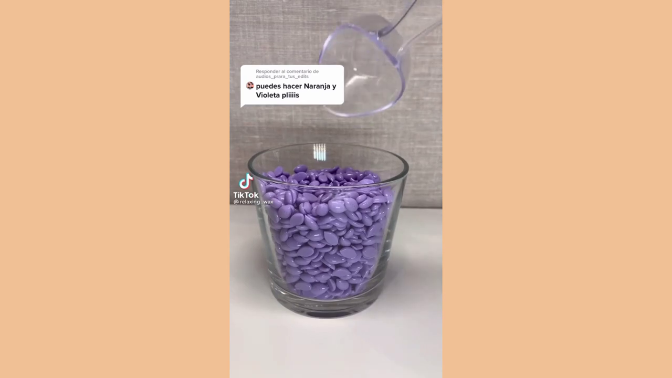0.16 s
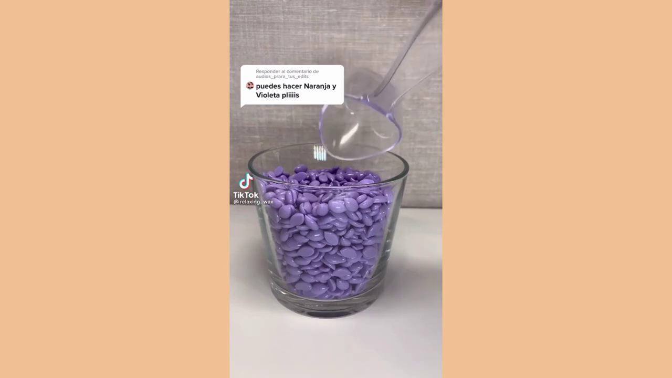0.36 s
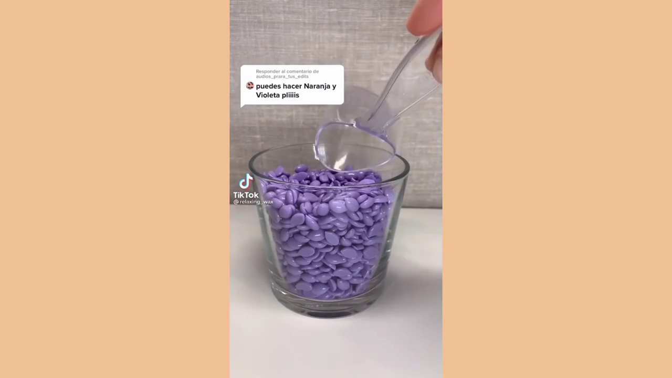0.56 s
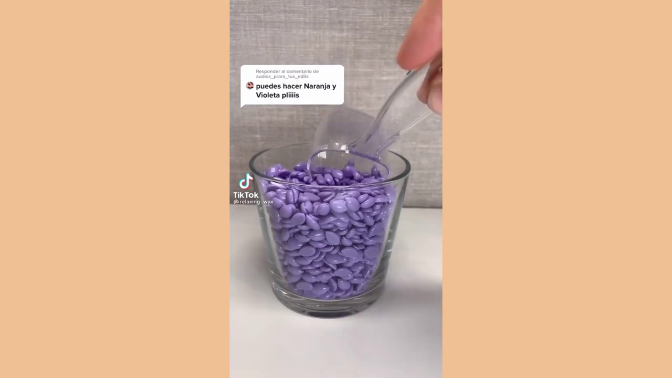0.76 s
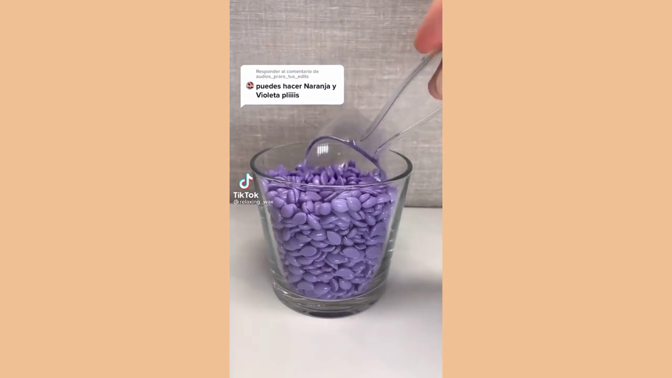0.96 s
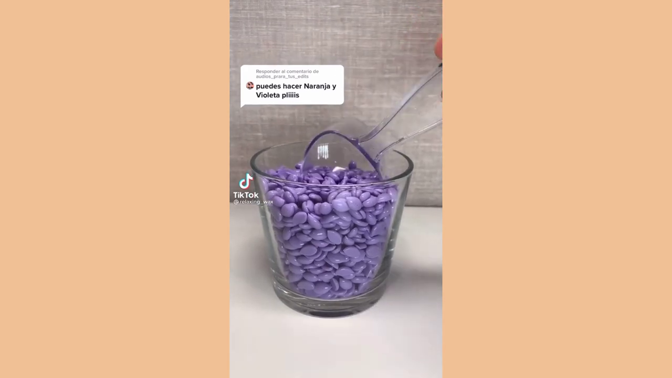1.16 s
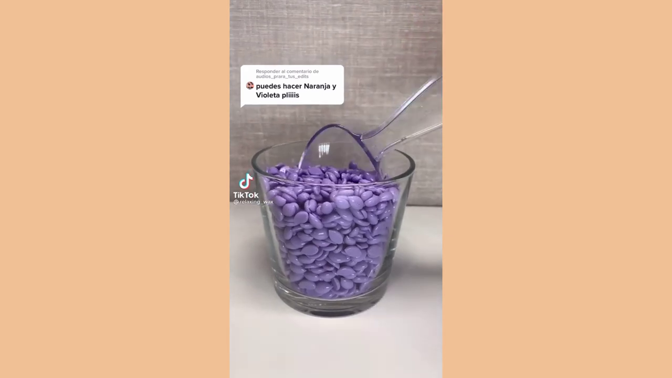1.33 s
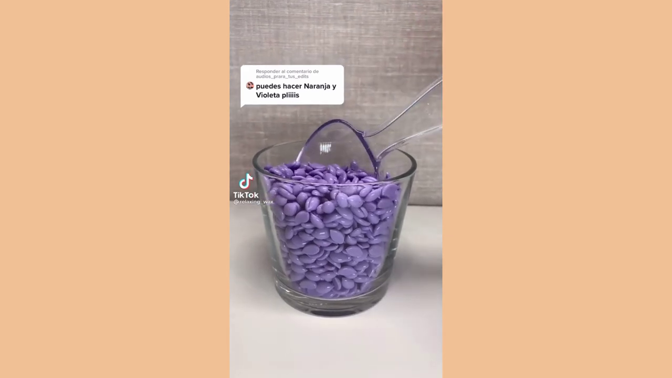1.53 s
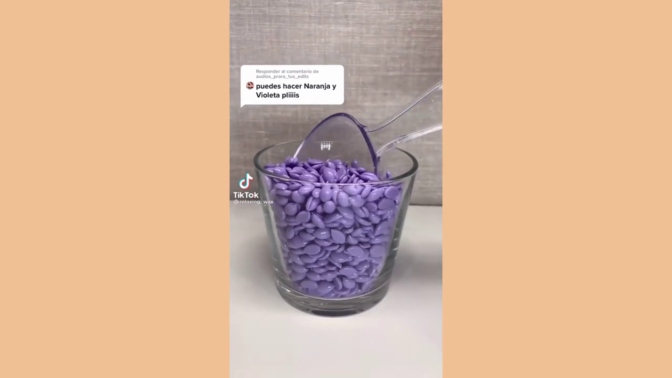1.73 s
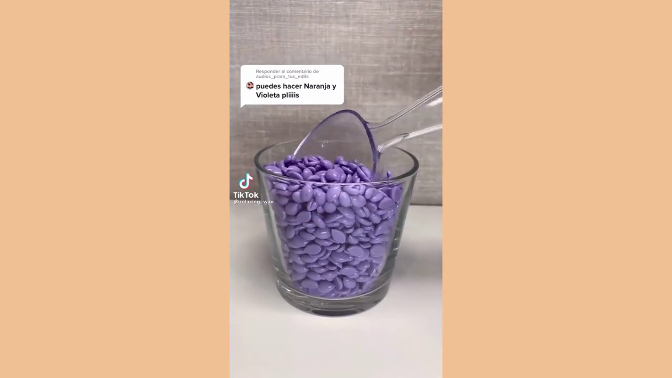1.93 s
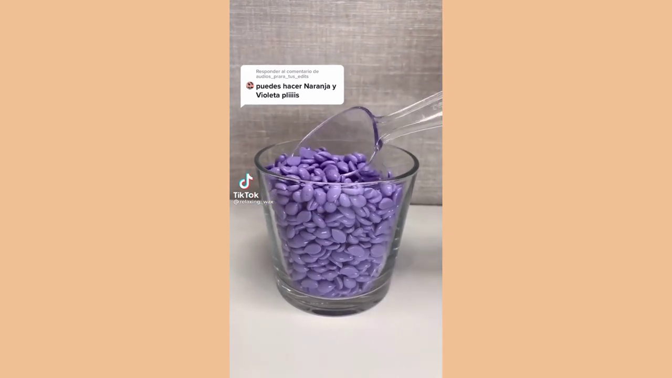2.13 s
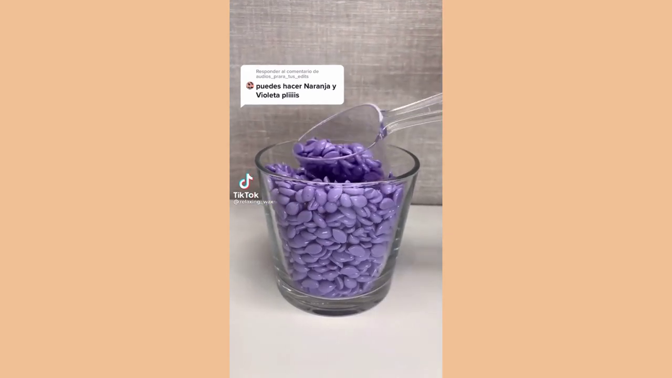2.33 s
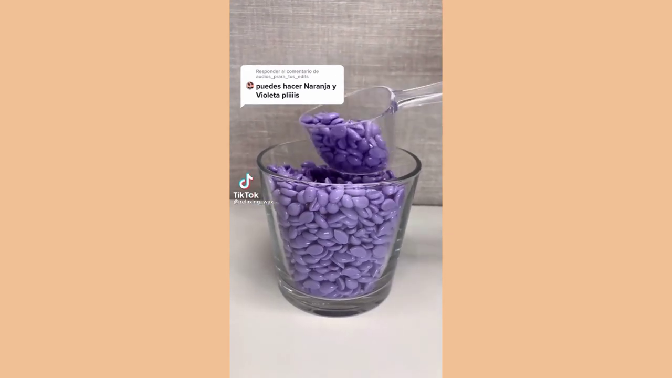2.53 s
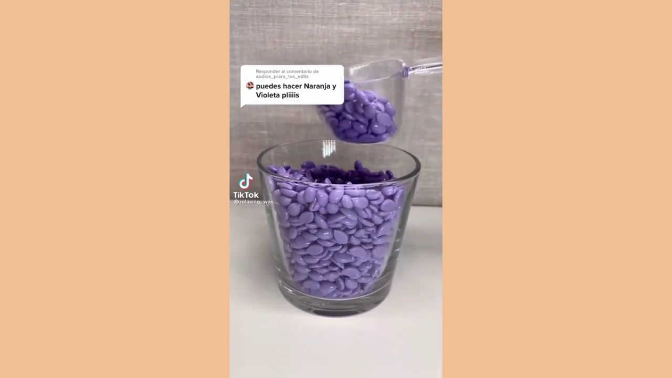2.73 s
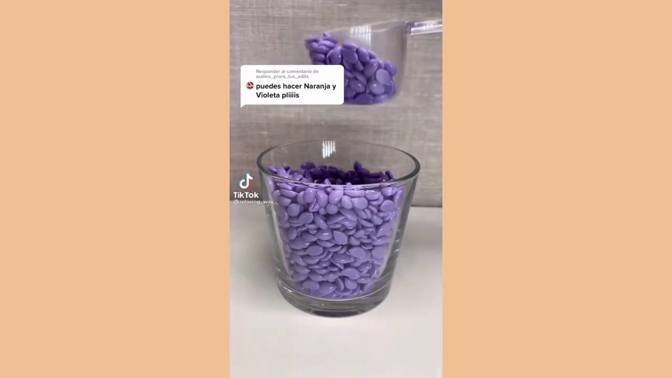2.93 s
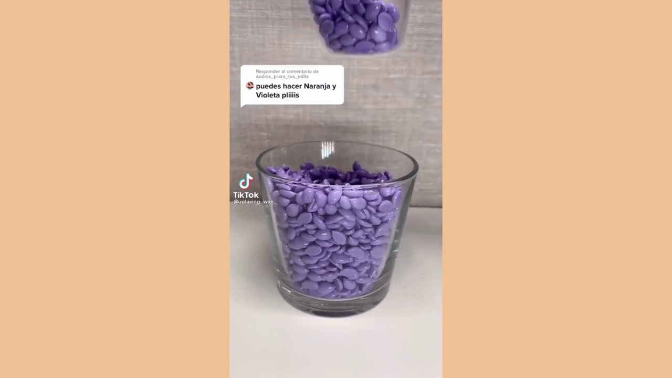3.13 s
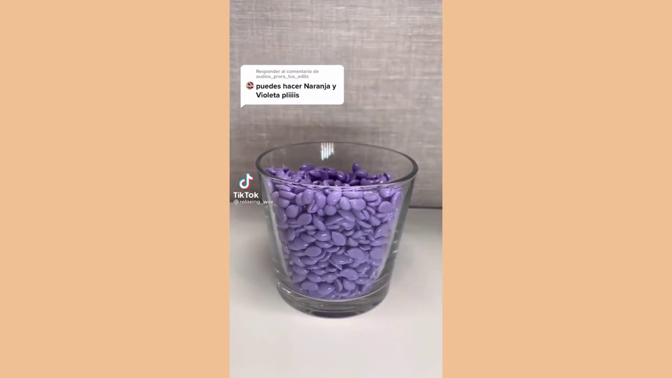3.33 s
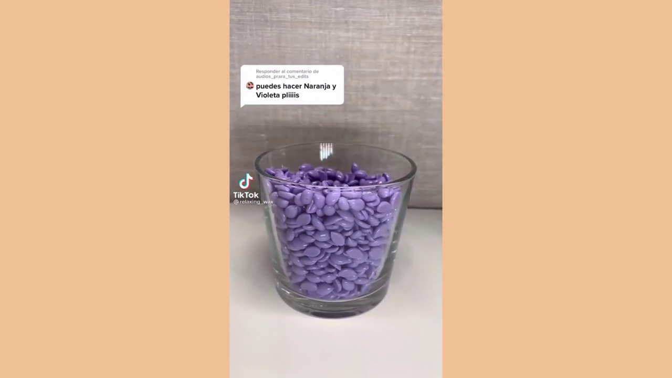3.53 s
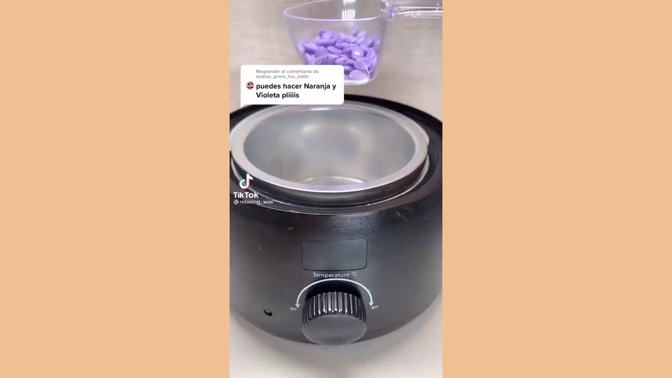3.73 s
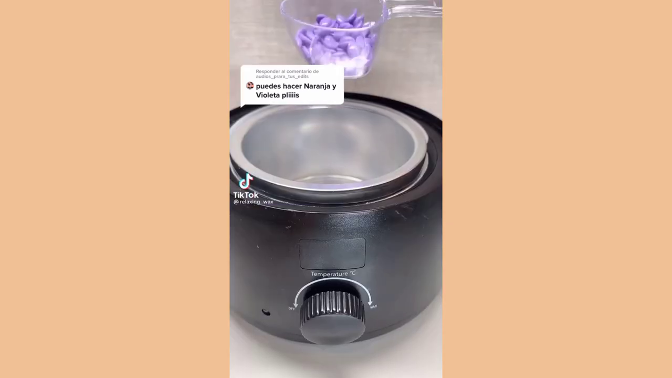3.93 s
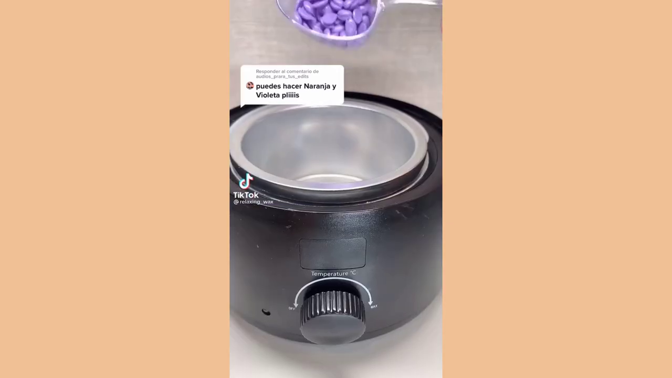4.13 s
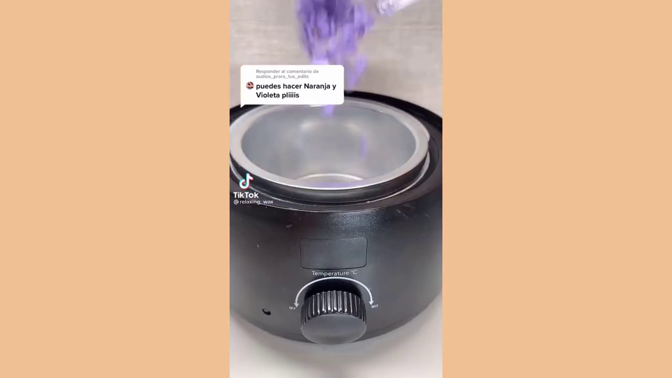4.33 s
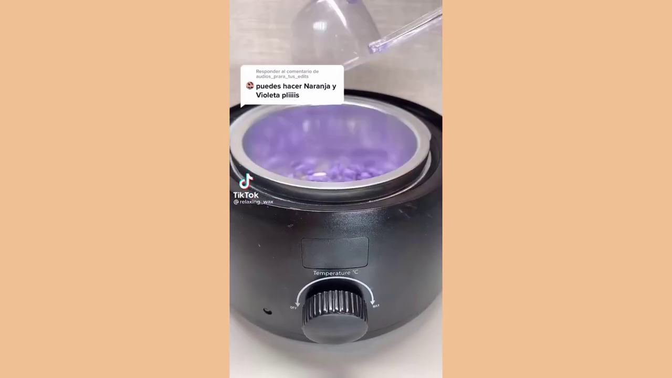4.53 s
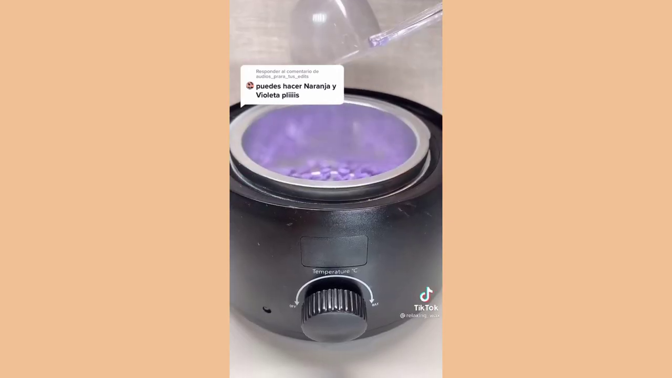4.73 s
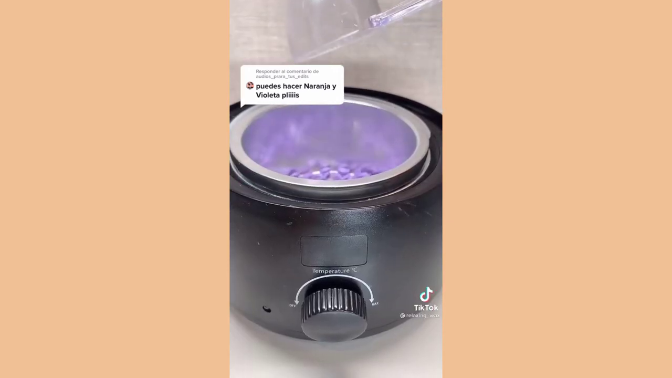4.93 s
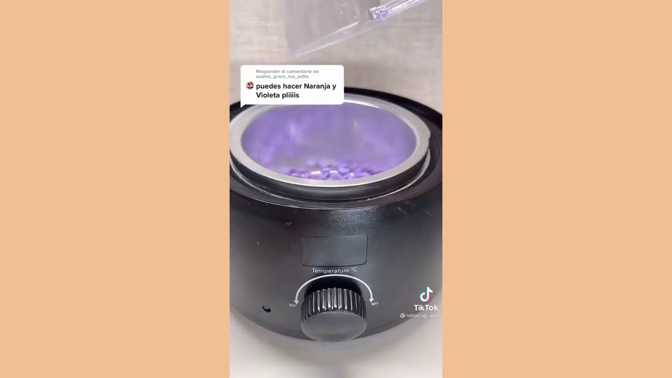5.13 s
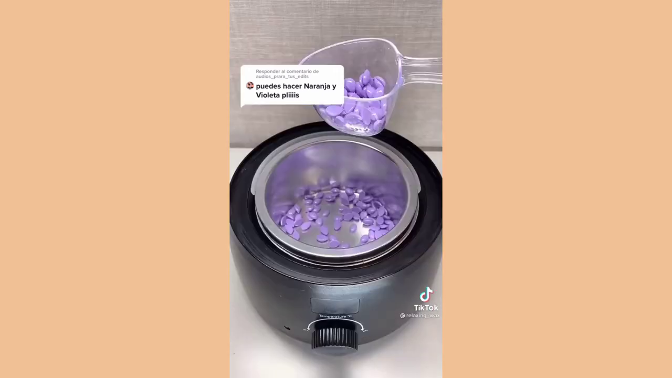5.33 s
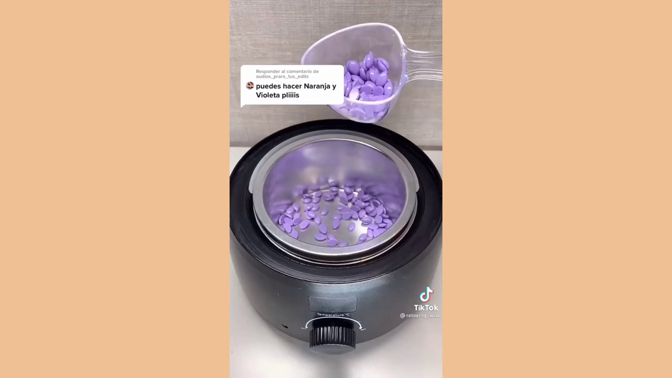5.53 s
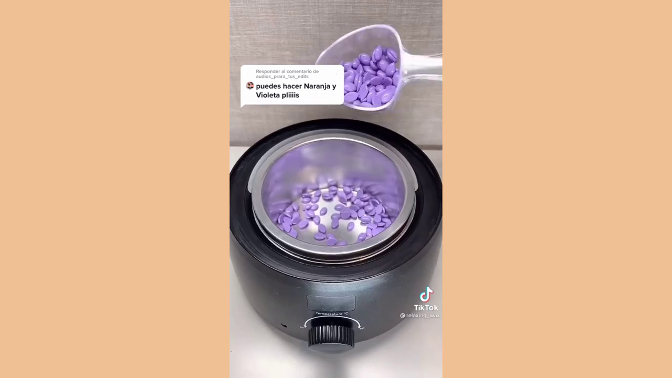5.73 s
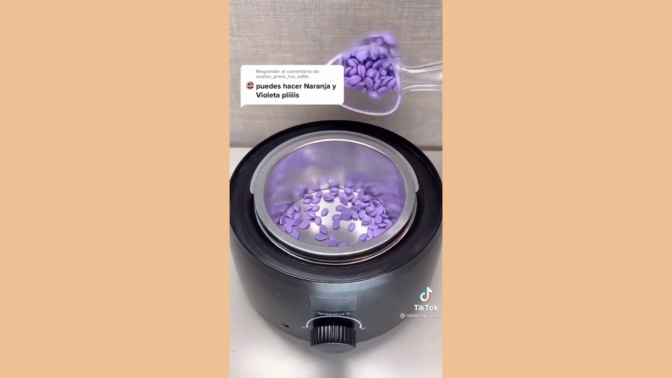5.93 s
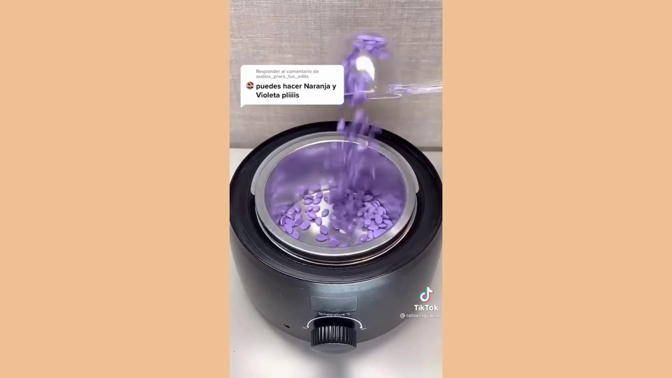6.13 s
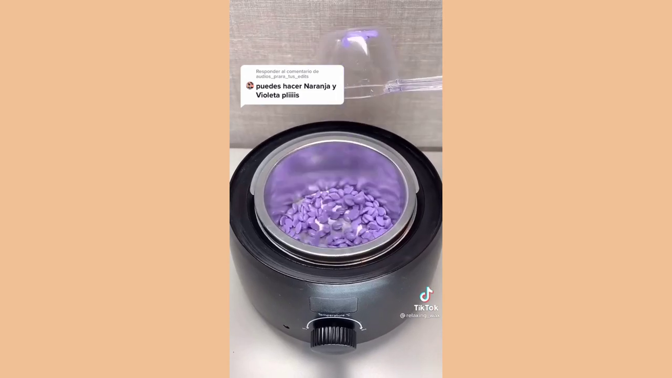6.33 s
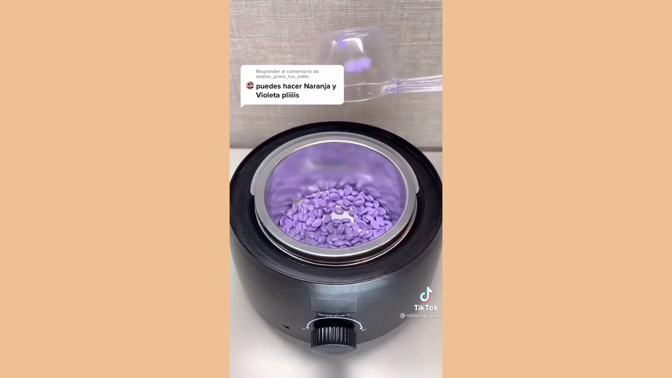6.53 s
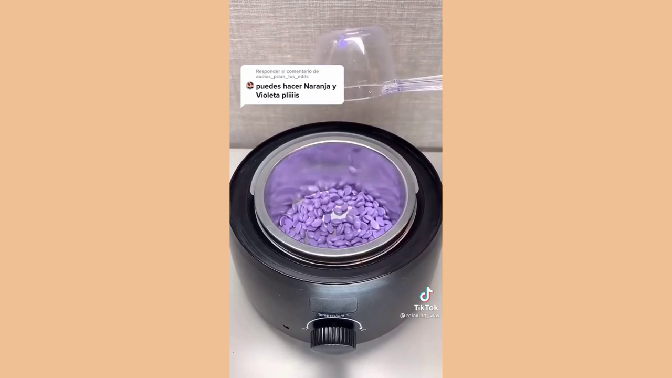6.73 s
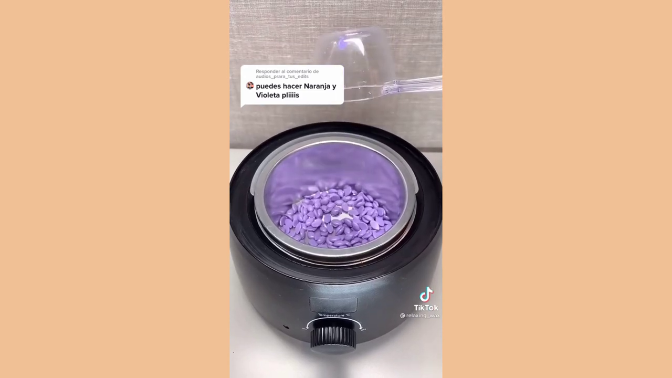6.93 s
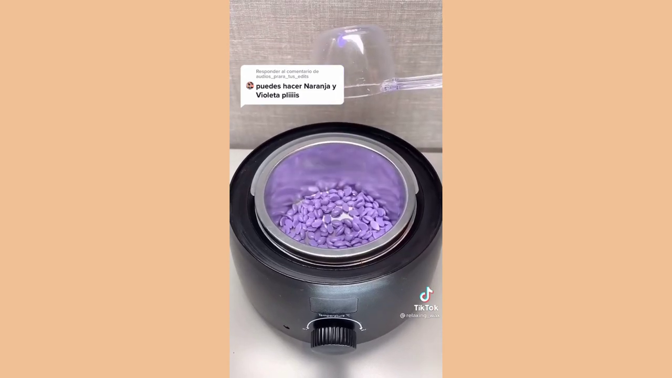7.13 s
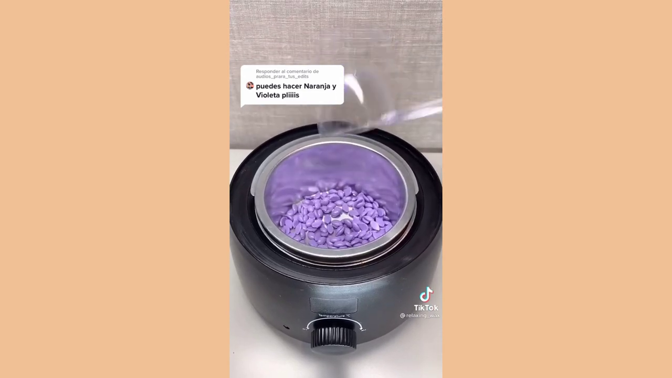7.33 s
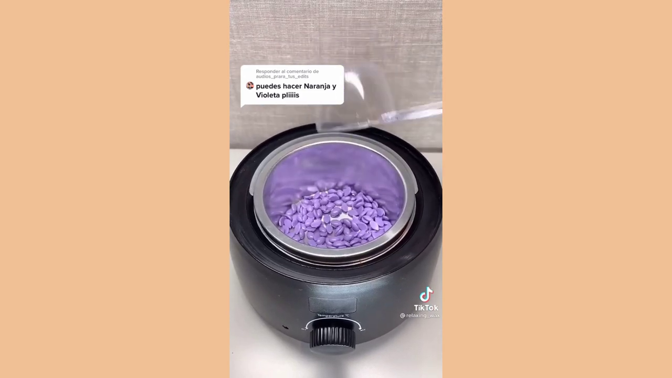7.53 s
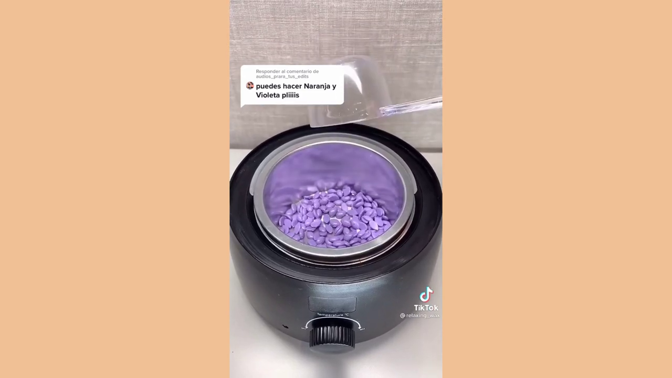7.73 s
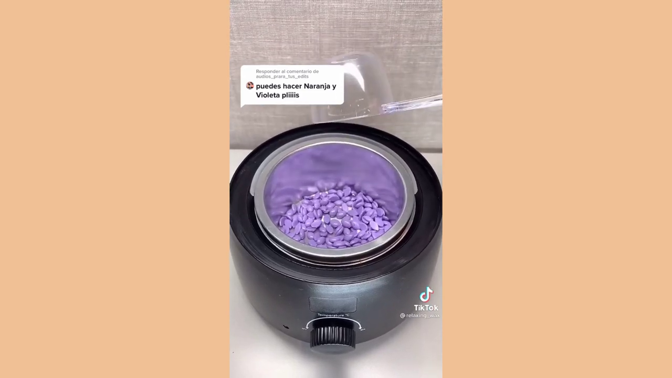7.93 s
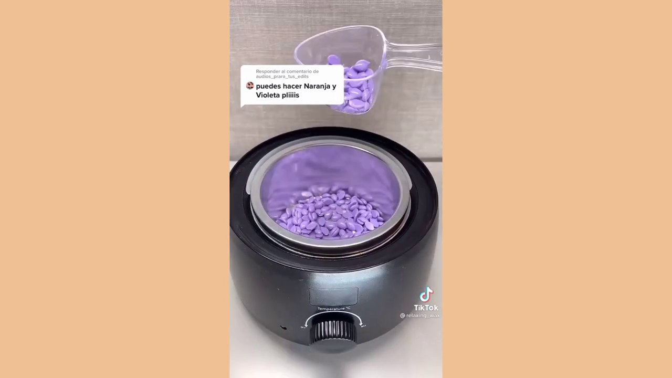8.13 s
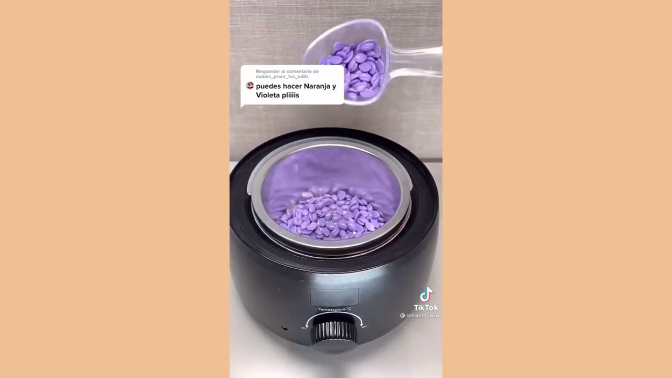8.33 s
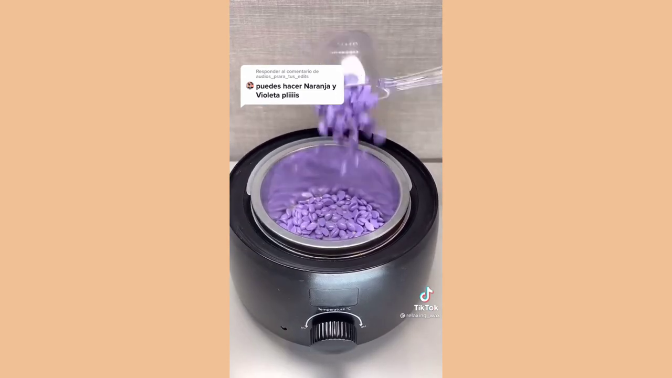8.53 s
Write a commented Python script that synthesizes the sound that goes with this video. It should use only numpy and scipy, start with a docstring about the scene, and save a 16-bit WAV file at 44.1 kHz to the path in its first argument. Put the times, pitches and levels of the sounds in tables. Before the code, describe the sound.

Close, dry indoor sound with a faint low hush and short room tail. From 0.4 s a plastic scoop knocks and stabs into hard wax beads in a glass, with strong crunches near 0.7 and 0.95 s, low table thuds, and weaker pushes until 1.5 s. A faint drag and rumble follow; from 1.7 to 2.9 s the load rustles with sharp plastic snaps, loudest around 2.2 and 2.6. Then near quiet, with a tiny shift at 3.65. At 4.2 beads skid off the scoop and from 4.37 shower brightly into a bare ringing metal pot, bouncing faintly until about 5.1. A softer, damped second pour lands at 6.1, with a late clump at 6.35 and single clicks to 6.9. Dull rim scuffs come at 7.3-7.6, then a faint low shuffle at 7.8. A third slide at 8.4 starts landing at 8.6 and stops abruptly. Brief total silences occur near 3.8, 5.4 and 8.0.

```python
"""A plastic scoop digs into a glass of hard wax beads: random collisions excite the glass, thrusts shake the table.
Lifted out, the load rustles and snaps against the plastic. Its beads slide down the scoop and shower into a metal
pot, which rings while bare. A second scoopful lands on a damping bed of beads, with stragglers dropping singly.
The scoop scuffs the rim and shuffles dully; the third scoopful has just begun to land at the end.
Throughout, a small quiet room adds a short diffuse tail and a low hush; brief silences interrupt all sound."""
import sys
import numpy as np
from scipy import signal
from scipy.fft import rfft, irfft
from scipy.io import wavfile
from scipy.ndimage import uniform_filter1d, map_coordinates

SR = 44100
rng = np.random.default_rng(int(sys.argv[2]) if len(sys.argv) > 2 else 0)


def generate_wav(sig):
    """Save sig (samples, or channels by samples) to the path in sys.argv[1] as 16-bit PCM at SR."""
    pcm = np.round(np.clip(np.atleast_2d(sig).T, -1, 1) * 32767).astype(np.int16)
    wavfile.write(sys.argv[1], SR, pcm)


N = 381906
TIME = np.arange(N) / SR

# Levels in the tables are relative: each layer is weighted again where it is mixed.
# thrusts of the scoop into the heap: start_s, rise_s, crunch_db, thud_db
THRUSTS = [(0.44, 0.0099, -35.5, -23), (0.692, 0.012, -15, -19.5), (0.933, 0.027, -15.5, -17),
           (1.211, 0.022, -34, -30.5), (1.345, 0.026, -40, -45), (1.46, 0.016, -27.5, -31),
           (1.68, 0.046, -44, -40.5)]
CRUNCH_FALL_DB_PER_S = 169.5
THUD_RISE_S, THUD_HOLD_S, THUD_FALL_DB_PER_S = 0.034, 0.015, 172.5
# the empty scoop knocks on the heap, later on the pot: start_s, strength_db, pitch_hz, treble_db
KNOCKS = [(0.446, -19, 1615, -34.5), (0.52, -20.5, 1368, -42.5), (7.322, -27.5, 1300, -41.5)]
# drag of the scoop along the tumbler and the rumble it gives the table
DRAG_S, DRAG_RISE_S, DRAG_HOLD_S, DRAG_FALL_DB_PER_S = 1.66, 0.25, 0.45, 37
DRAG_DB, RUMBLE_DB = -53.5, -48.5
# beads shifting as the loaded scoop is turned and lifted out: time_s, level_db
LIFT = [(1.05, -58.5), (1.66, -49), (1.95, -42), (2.13, -33.5), (2.19, -26), (2.3, -41.5), (2.5, -46),
        (2.61, -34.5), (2.72, -46.5), (2.87, -42.5), (3.02, -83)]
# a bead snaps against the scoop: start_s, strength_db, pitch_hz, treble_db
SNAPS = [(0.7003, -2, 4490, -0.5), (0.7678, -7.5, 6950, -9), (0.794, -10.5, 6490, -19.5),
         (0.9708, 2.5, 4450, -11.5), (1.1164, -17, 4350, 1), (1.7329, -16.5, 6430, -26),
         (1.7602, -18, 6600, -18), (1.815, -25, 6500, -20), (1.8812, -17, 6500, -17),
         (1.9185, -22, 7500, -8), (1.999, -14.5, 4930, -43.5), (2.0282, -9.5, 4580, -34),
         (2.0733, -7, 4390, -13.5), (2.137, -9, 4930, -25), (2.1722, 1, 6140, -20.5),
         (2.377, -21.5, 8600, -15), (2.435, -24.5, 2090, -5.5), (2.5414, -7, 5940, -9.5),
         (2.575, -12, 6140, -20), (2.598, -4.5, 7300, -39), (2.6433, -9, 4720, -6),
         (2.7808, -20, 4800, -33), (2.8558, -13, 4950, -17.5), (3.3069, -48.5, 6500, -33.5),
         (3.6939, -22.5, 6170, -32), (4.2348, -19.5, 7980, -26), (4.2625, -4, 7500, -5.5),
         (4.2754, -7.5, 2330, -32), (4.3138, -2.5, 7350, -16.5), (4.363, 2, 6170, -10),
         (5.923, -24.5, 6760, -24), (5.9784, -12, 9320, -0.5), (8.4535, -7, 7540, 9),
         (8.5125, -6, 7400, -11)]
# the load shifts once as it is carried to the pot
JOSTLE_S, JOSTLE_DB = 3.65, -49.5
# scoopfuls tipped into the pot: tipped_s, lands_s, shower_hold_s, slide_db, shower_db
POURS = [(4.223, 4.366, 0.15, -23, -13), (5.911, 6.086, 0.155, -30.5, -16),
         (8.392, 8.589, 0.16, -28.5, -13.5)]
SLIDE_RISE_S, SLIDE_FALL_DB_PER_S = 0.076, 219.5
SHOWER_RISE_S, SHOWER_FALL_DB_PER_S = 0.022, 150
# bouncing on bare metal after the first shower; the delay counts from its landing
SETTLE_DELAY_S, SETTLE_RISE_S, SETTLE_HOLD_S, SETTLE_FALL_DB_PER_S, SETTLE_DB = 0.27, 0.083, 0.37, 70.5, -52
# a single bead strikes the pot: start_s, strength_db, pitch_hz, treble_db
DROPS = [(4.3773, -1.5, 2830, -15), (4.4034, -10, 5200, -22.5), (4.773, -21, 2260, -20),
         (4.9867, -30.5, 2260, -40.5), (5.0241, -34.5, 2300, -45), (5.0795, -32, 2260, -41.5),
         (6.0956, -4, 4500, -7), (6.1373, 3, 4990, -11.5), (6.2605, 3.5, 3750, -43.5),
         (6.347, -1, 6930, -20), (6.3686, -11.5, 5900, -9), (6.431, -9, 6880, -53),
         (6.584, -20.5, 4620, -17), (6.6632, 0, 3690, -25.5), (6.6845, 1, 5700, -9.5),
         (6.767, -5.5, 5760, -32), (6.8478, -14, 2180, -23.5), (6.8693, -12, 3680, -21.5),
         (6.8834, -2, 8300, 2), (7.5836, -7.5, 2190, -17), (8.5929, -4.5, 3880, -22.5)]
# a late clump lets go of the scoop: start_s, level_db
CLUMPS = [(6.338, -21), (6.87, -33)]
CLUMP_RISE_S, CLUMP_FALL_DB_PER_S = 0.0087, 165
# the scoop scuffs the rim of the pot: start_s, rise_s, level_db
SCUFFS = [(7.314, 0.0079, -41.5), (7.461, 0.033, -27), (7.575, 0.012, -32.5)]
SCUFF_FALL_DB_PER_S = 176
SHUFFLE_S, SHUFFLE_RISE_S, SHUFFLE_HOLD_S, SHUFFLE_FALL_DB_PER_S, SHUFFLE_DB = 7.78, 0.04, 0.04, 120, -56
# moments when all falls silent: from_s, to_s
SILENCES = [(3.76, 3.825), (5.36, 5.425), (5.475, 5.497), (7.985, 8.1)]
TOP_HZ = 15600

# spectra of the contacts: frequency_hz, level_db
# empty scoop knocking; beads in the heap; beads of the load
KNOCK_COLOUR = [(290, -37.5), (500, -2.5), (1190, -9), (1660, -0.5), (4100, -17), (7580, -24.5),
                (14000, -49.5)]
HEAP_COLOUR = [(280, -43), (480, -8), (1160, -11.5), (1490, -1.5), (1720, -6), (4030, -12), (4270, -4),
               (5560, -9), (6260, -1), (8270, -11), (10800, -29.5), (14900, -22), (16000, -35)]
LOAD_COLOUR = [(240, -50), (400, -25.5), (979, -20.5), (1160, -21), (1930, -6), (2800, -13), (4380, -8),
               (5690, -6.5), (6150, -5.5), (7750, -5), (10700, -25), (14400, -17), (16000, -36)]
# beads sliding on the scoop; showering on bare metal; bouncing and dropping singly on bare metal
SCOOP_COLOUR = [(290, -53.5), (500, -28.5), (1260, -28), (1640, -9), (1950, -15), (2290, -14), (3980, -23),
                (4340, -13.5), (5550, -10.5), (7310, -5), (9490, -4), (10800, -17), (14700, -9),
                (16000, -21.5)]
METAL_COLOUR = [(35, -53), (60, -23.5), (330, -27), (440, -15), (621, -23.5), (975, -8), (1170, -10),
                (1550, -13.5), (2300, -2.5), (4320, -10.5), (6900, -5), (11000, -16), (14900, -16),
                (16000, -32)]
SETTLING_COLOUR = [(290, -56), (500, -29.5), (950, -3.5), (1960, -14.5), (2290, -5), (6590, -16.5),
                   (14000, -49)]
# beads landing on beads; scoop on the rim; soft, low shuffle after the last scuff
BED_COLOUR = [(41, -55.5), (70, -22), (166, -18.5), (204, -25), (620, -23.5), (913, -13.5), (1580, -12),
              (2070, -10), (2980, -8.5), (3820, -6), (7060, -7), (10900, -19), (14600, -20.5), (16000, -22)]
RIM_COLOUR = [(88, -54), (150, -13), (637, -9), (805, -7.5), (1310, -10.5), (2700, -0.5), (3290, -7.5),
              (3770, -7.5), (7620, -14.5), (10800, -36), (14800, -44), (16000, -56)]
SHUFFLE_COLOUR = [(35, -30), (60, -2), (310, -3), (359, 1), (656, -32), (1050, -28), (2000, -31),
                  (2600, -59), (4400, -120)]
# spectrum of the quiet room: frequency_hz, level_db
AIR_COLOUR = [(15, -36.5), (25, -9), (59, -5), (157, -22), (195, -18), (229, -26), (607, -31), (1190, -35),
              (1610, -35.5), (2760, -39), (6560, -46), (16000, -58.5)]
AIR_DB = -57

# resonances of the vessels, the dragged tumbler and the table top: frequency_hz, width_hz, lift_db
GLASS_MODES = [(1490, 230, 7), (2307, 54, 5), (3250, 230, 1), (4350, 41, 7), (6140, 240, -4.5),
               (6950, 43, 1.5), (7560, 150, -6), (8000, 33, 3.5)]
DRAG_MODES = [(538, 160, 0.5), (725, 120, -6.5), (976, 260, 3)]
SCOOP_MODES = [(1614, 69, 7.4), (1880, 230, 8.2), (2370, 120, 5), (3440, 120, 6), (4350, 90, 11),
               (4950, 220, 3), (6170, 300, 3.6), (7300, 260, 3), (9000, 130, 4), (9440, 97, 8.8),
               (11700, 320, 3)]
POT_MODES = [(976, 51, 12), (1300, 54, 7), (1740, 47, 4), (2260, 60, 2), (2840, 40, 3.9), (3210, 110, 1.1),
             (3850, 110, 5.9), (5200, 120, 11), (6760, 61, 2.7), (7140, 40, 3), (8380, 580, 6),
             (9270, 98, 6.8)]
BED_MODES = [(2110, 91, 5), (3750, 110, 1), (4970, 340, -2), (5910, 95, -2), (6930, 120, 0.5),
             (8470, 260, 3.5), (9270, 360, 1.5), (14440, 1000, 1.5)]
TABLE_MODES = [(79.6, 4.1, 2), (99, 37, -3.5), (121, 12, 4.5), (176, 12, -3), (225, 10, 1)]


def pot():
    """Modal ringing and damping: the bare pot rings under the first shower; a bed of beads damps later ones."""
    first_lands_s, covered_s = POURS[0][1], POURS[1][0]
    settle_s = first_lands_s + SETTLE_DELAY_S
    bouncing = undb(SETTLE_DB) * swell(settle_s, SETTLE_RISE_S, SETTLE_HOLD_S, SETTLE_FALL_DB_PER_S)
    clumps = sum(undb(db) * swell(s, CLUMP_RISE_S, 0, CLUMP_FALL_DB_PER_S) for s, db in CLUMPS)

    shower = rattle(showers(POURS[:1]), rate=1100, spread_db=4.0, decay_s=0.003, focus_db=4.0)
    settle = rattle(bouncing, rate=93, spread_db=1.0, decay_s=0.004, focus_db=6)
    later = rattle(showers(POURS[1:]) + clumps, rate=550, spread_db=3.0, decay_s=0.0037, focus_db=5.5)

    bare = body(SETTLING_COLOUR, POT_MODES, ring_db=-5)
    bed = body(BED_COLOUR, BED_MODES, ring_db=-3.0)
    early_drops = [row for row in DROPS if row[0] < covered_s]
    late_drops = [row for row in DROPS if row[0] > covered_s]
    on_bare = clicks(early_drops, bare, decay_s=0.0029, chatter=0.11, focus_db=11)
    on_bed = clicks(late_drops, bed, decay_s=0.0046, chatter=0.13, focus_db=5.0)

    bare_pot = convolve(shower, body(METAL_COLOUR, POT_MODES, ring_db=-2.0))
    bare_pot = bare_pot + undb(-3.0) * convolve(settle, bare) + undb(10.5) * on_bare
    return bare_pot + convolve(later, bed) + undb(10.0) * on_bed


def showers(pours):
    """Mass flow as excitation: the stream of beads into the pot builds, holds and dies away."""
    return sum(undb(db) * swell(lands, SHOWER_RISE_S, hold, SHOWER_FALL_DB_PER_S)
               for _, lands, hold, _, db in pours)


def digging():
    """Granular collision and friction: the scoop knocks and drags; beads grind, then rustle into it."""
    push = sum(undb(db) * swell(s, rise, 0, CRUNCH_FALL_DB_PER_S) for s, rise, db, _ in THRUSTS)
    crunch = rattle(push, rate=1800, spread_db=7.0, decay_s=0.0049, focus_db=4)
    crunch = convolve(crunch, body(HEAP_COLOUR, GLASS_MODES, ring_db=-8.0))

    knock_body = body(KNOCK_COLOUR, GLASS_MODES, ring_db=-10.5)
    knocks = clicks(KNOCKS, knock_body, decay_s=0.0059, chatter=0.25, focus_db=4.5)

    drag = rattle(undb(DRAG_DB) * dragging(), rate=830, spread_db=5, decay_s=0.0033, focus_db=-21.5)
    drag = ring(drag, DRAG_MODES)
    drag = ring(drag, [(740, 904, 0.001)])  # one very broad resonance

    lift = undb(np.interp(TIME, *np.transpose(LIFT), left=-np.inf, right=-np.inf))
    rustle = rattle(lift, rate=230, spread_db=3.0, decay_s=0.0033, focus_db=7.5)
    rustle = convolve(rustle, body(LOAD_COLOUR, GLASS_MODES, ring_db=-2))
    rustle = wander(rustle, depth_s=0.001, rate=14)
    return undb(15.5) * knocks + undb(-2.0) * crunch + undb(14.0) * drag + undb(-1.5) * rustle


def dragging():
    """Contact pressure as excitation: the scoop bears on the wall of the tumbler."""
    return swell(DRAG_S, DRAG_RISE_S, DRAG_HOLD_S, DRAG_FALL_DB_PER_S)


def scoop():
    """Resonance of a thin shell: beads skid along the bowl and snap on its wall; the shifting load retunes it."""
    slide = sum(undb(db) * swell(tipped, SLIDE_RISE_S, lands - tipped - SLIDE_RISE_S, SLIDE_FALL_DB_PER_S)
                for tipped, lands, _, db, _ in POURS)
    slide = slide + undb(JOSTLE_DB) * swell(JOSTLE_S, SLIDE_RISE_S, 0, SLIDE_FALL_DB_PER_S)
    skid = rattle(slide, rate=1000, spread_db=5.5, decay_s=0.0034, focus_db=2)
    skid = convolve(skid, body(SCOOP_COLOUR, SCOOP_MODES, ring_db=0.0))
    skid = wander(skid, depth_s=0.0008, rate=16)
    snap_body = body(LOAD_COLOUR, SCOOP_MODES, ring_db=-7.5)
    snaps = clicks(SNAPS, snap_body, decay_s=0.0054, chatter=0.15, focus_db=12.5)
    return undb(-2) * skid + undb(9.5) * snaps


def rim():
    """Stick-slip friction: plastic catches and slips on the rim in many small contacts, a dull, fine scuff."""
    rub = sum(undb(db) * swell(s, rise, 0, SCUFF_FALL_DB_PER_S) for s, rise, db in SCUFFS)
    slips = rattle(rub, rate=1300, spread_db=5.0, decay_s=0.0028, focus_db=-14)
    return undb(-3) * convolve(slips, body(RIM_COLOUR, BED_MODES, ring_db=-6.0))


def table():
    """Structure-borne sound: jerks of the scoop pass through the glass and shake the table top."""
    push = sum(undb(db) * swell(s, THUD_RISE_S, THUD_HOLD_S, THUD_FALL_DB_PER_S) for s, _, _, db in THRUSTS)
    push = push + undb(RUMBLE_DB) * dragging()
    shake = ring(rng.standard_normal(N), TABLE_MODES)
    shake = shake / np.sqrt(uniform_filter1d(shake ** 2, size=1200))  # even out the level
    return signal.sosfilt(signal.butter(6, 300, fs=SR, output="sos"), push * shake)


def shuffle():
    """Broadband friction: low-coloured noise makes a faint, dull shuffle as the scoop is taken away."""
    gain = undb(SHUFFLE_DB) * swell(SHUFFLE_S, SHUFFLE_RISE_S, SHUFFLE_HOLD_S, SHUFFLE_FALL_DB_PER_S)
    return gain * convolve(rng.standard_normal(N), colour(SHUFFLE_COLOUR))


def room(x, wet_db, t60_mid, t60_top):
    """Diffuse reverberation: decaying noise stands for dense reflections; the treble dies sooner."""
    t = TIME[:SR * 3 // 4]
    low_pass = signal.butter(2, 4500, fs=SR, output="sos")
    high_pass = signal.butter(2, 4500, "high", fs=SR, output="sos")
    low = signal.sosfilt(low_pass, rng.standard_normal(len(t)))
    high = signal.sosfilt(high_pass, rng.standard_normal(len(t)))
    tail = low * np.exp(-np.log(1000) * t / t60_mid)
    tail = tail + undb(1.0) * high * np.exp(-np.log(1000) * t / t60_top)
    tail *= 1 - np.exp(-(t / 0.0023) ** 2)  # gradual onset of the reflections
    return x + undb(wet_db) * convolve(x, unit(tail) / np.sqrt(len(t)))


def air():
    """Stationary noise: the low hush of the quiet room has a fixed spectrum and level."""
    return undb(AIR_DB) * unit(convolve(rng.standard_normal(N), colour(AIR_COLOUR, size=8192)))


def rattle(gain, rate, spread_db, decay_s, focus_db, count=10):
    """Random collisions: each kind of bead has its pitch region, and a stronger flow makes more hits."""
    density = rate * (gain / gain.max()) ** 0.28  # hits per second
    hits = np.flatnonzero(rng.random(N) < density / SR)
    sizes = undb(spread_db * np.minimum(rng.exponential(size=N), 3)) * rng.choice([-1, 1], N)
    kinds = rng.integers(0, count, N)
    out = 0
    for kind, hz in enumerate(np.geomspace(2200, 9500, count)):
        train = np.zeros(N)
        own = hits[kinds[hits] == kind]
        train[own] = sizes[own]
        tick = contact(decay_s, 0.33)
        tick = tick + ring(tick, [(hz, 0.078 * hz, focus_db)])
        out = out + convolve(train, tick / np.linalg.norm(tick))
    # the beads share the energy that the flow delivers
    power = np.abs(uniform_filter1d(out ** 2, size=1800))
    return gain * out / np.sqrt(power + 0.27 * density / SR + 1e-9)


def clicks(events, response, decay_s, chatter, focus_db):
    """Impact excitation: single hard blows, each with its own pitch region and sharpness."""
    out = np.zeros(N + SR)
    usual_db = np.median(np.array(events)[:, 3])
    for s, db, hz, treble_db in events:
        blow = signal.fftconvolve(contact(decay_s, chatter), response)
        blow = blow + ring(blow, [(hz, 0.069 * hz, focus_db)])
        treble = signal.lfilter(*signal.butter(1, 11000, "high", fs=SR), blow)
        # sharpness follows the departure from the median treble
        blow = blow + (undb(1.7 * (treble_db - usual_db)) - 1) * treble
        start = int(s * SR)
        out[start:start + len(blow)] += undb(db) * blow / np.linalg.norm(blow)
    return out[:N]


def contact(decay_s, chatter, size=1024):
    """Impulsive contact: a spike followed by a few milliseconds of decaying chatter."""
    burst = chatter * rng.standard_normal(size) * np.exp(-np.arange(size) / SR / decay_s)
    burst[0] += 1
    return burst / np.linalg.norm(burst)


def body(points, modes, ring_db):
    """Modal response: the direct contact plus the resonances it wakes, at unit energy."""
    direct = colour(points)
    return unit(direct + undb(ring_db) * ring(direct, modes)) / np.sqrt(len(direct))


def ring(x, modes):
    """Superposition of modes: x drives a sum of two-pole resonances."""
    return sum(undb(db) * signal.lfilter(*signal.iirpeak(hz, hz / width, fs=SR), x) for hz, width, db in modes)


def colour(points, size=2048):
    """Minimum phase: a causal response of unit energy follows from its (Hz, dB) spectrum by the cepstrum."""
    hz, db = np.transpose(points)
    f = np.maximum(np.arange(size // 2 + 1) * SR / size, 1)
    gain = undb(np.interp(np.log(f), np.log(hz), db))
    cepstrum = irfft(np.log(gain))
    # fold the anticausal half onto the causal one
    cepstrum[1:size // 2] *= 2
    cepstrum[size // 2 + 1:] = 0
    return unit(irfft(np.exp(rfft(cepstrum)))) / np.sqrt(size)


def wander(x, depth_s, rate):
    """Time-varying delay: a smooth random drift bends all pitches up and down together."""
    hold = int(SR / rate)
    drift = np.repeat(rng.standard_normal(N // hold + 1), hold)[:N]
    drift = uniform_filter1d(uniform_filter1d(drift, hold), hold)
    return map_coordinates(x, [np.arange(N) + depth_s * SR * drift], order=5)


def swell(start, rise, hold, fall_db_per_s):
    """Envelope of one movement: linear growth, a hold, then exponential decay."""
    age = TIME - start
    return np.clip(age / rise, 0, 1) * undb(-fall_db_per_s * np.clip(age - rise - hold, 0, 2))


def convolve(x, response):
    """Linear filtering: x passes through an impulse response."""
    return signal.oaconvolve(x, response)[:len(x)]


def undb(db):
    """Logarithmic level: decibels become an amplitude ratio."""
    return 10 ** (np.asarray(db) / 20)


def unit(x):
    """Normalisation: x is scaled to an rms of 1."""
    return x / np.sqrt(np.mean(x ** 2) + 1e-20)


def scene():
    """Superposition of sources: beads in the room, the shaken table, the hush and the shuffle."""
    beads = room(digging() + scoop() + pot() + rim(), wet_db=-9, t60_mid=0.38, t60_top=0.2)
    return (beads + table() + air() + shuffle())[None]


def record(dry):
    """Saturation and band limiting: rounded peaks, brief silences and a steep top cut."""
    live = np.ones(N)
    for start, end in SILENCES:
        live[int(start * SR):int(end * SR)] = 0
    sound = np.tanh(dry) * uniform_filter1d(live, size=128)
    return signal.sosfilt(signal.ellip(10, 0.2, 70, TOP_HZ, fs=SR, output="sos"), sound)


dry = scene()
out = record(dry)
generate_wav(out)
```